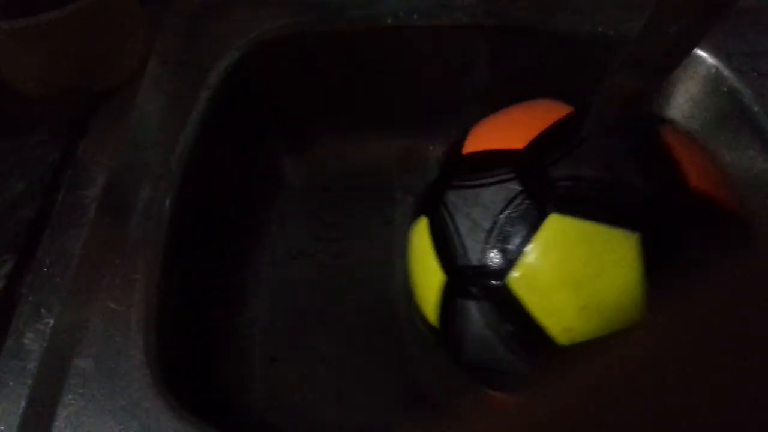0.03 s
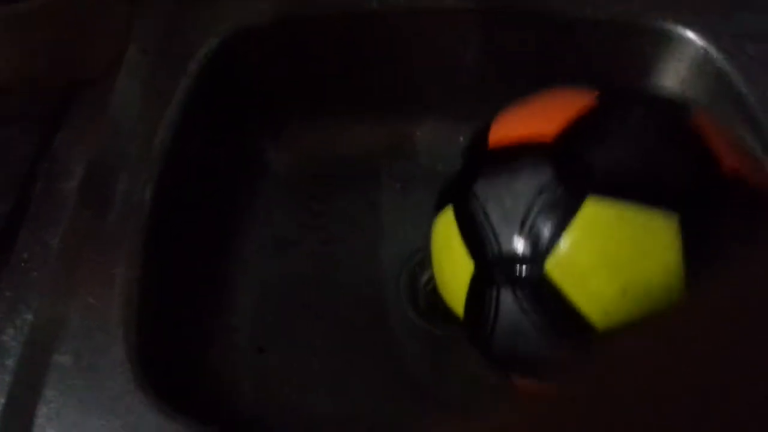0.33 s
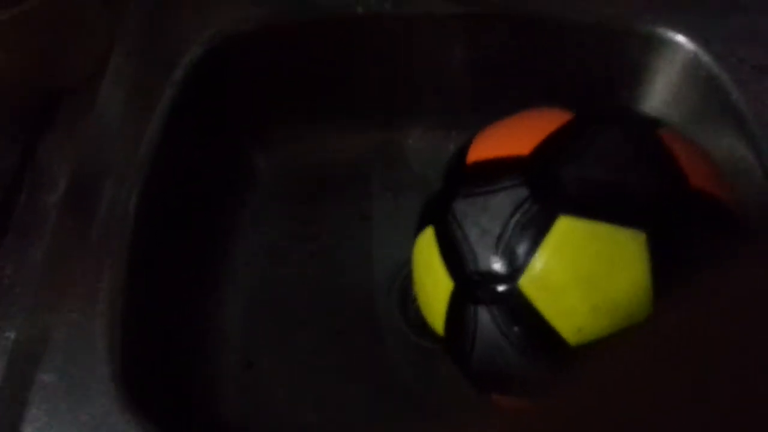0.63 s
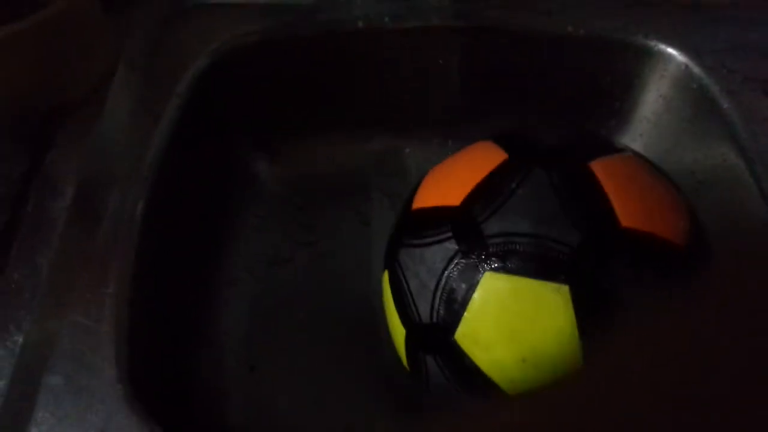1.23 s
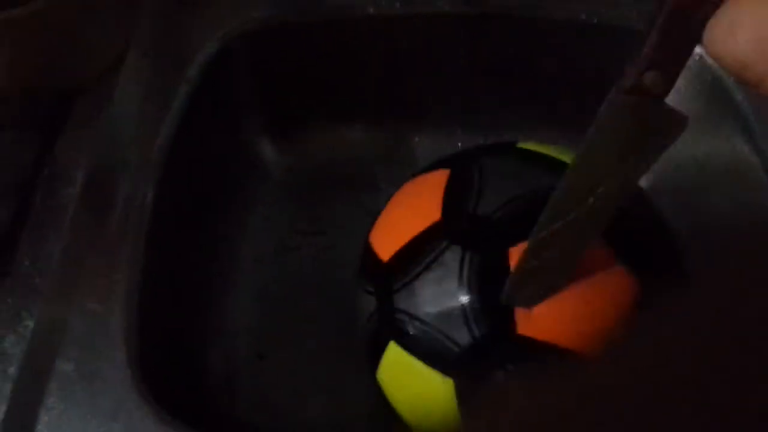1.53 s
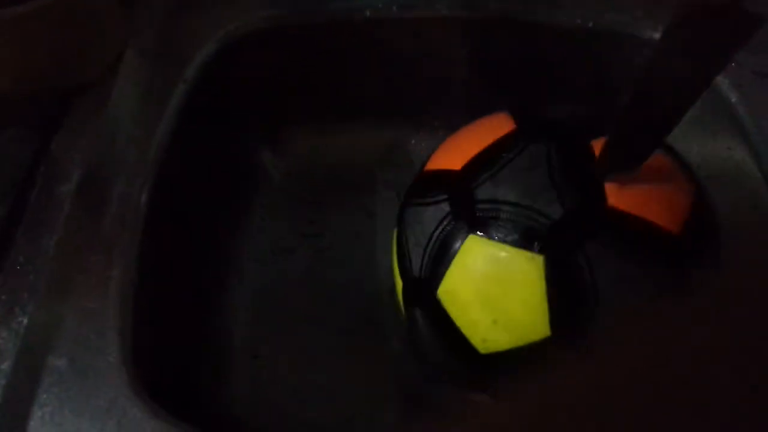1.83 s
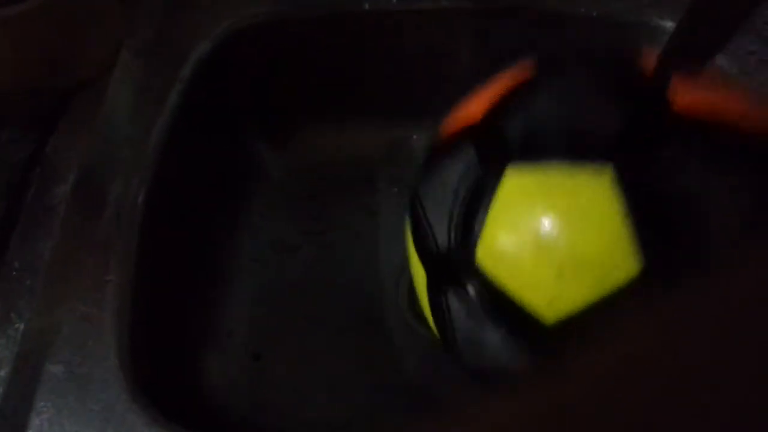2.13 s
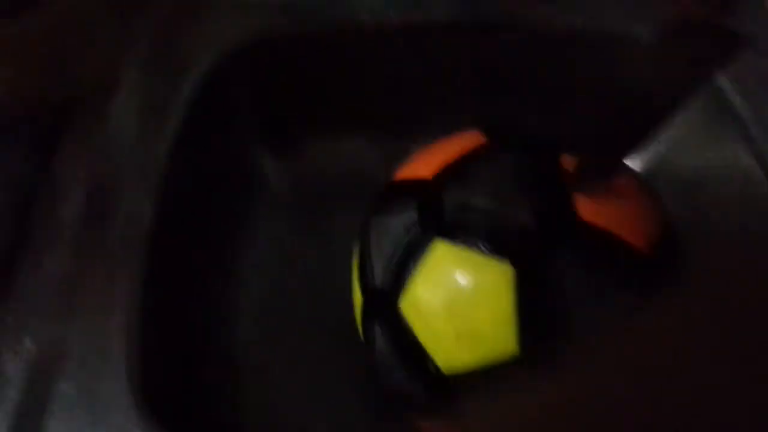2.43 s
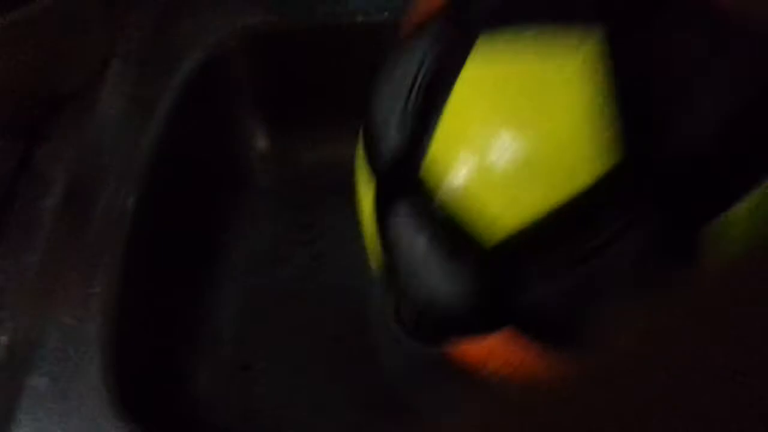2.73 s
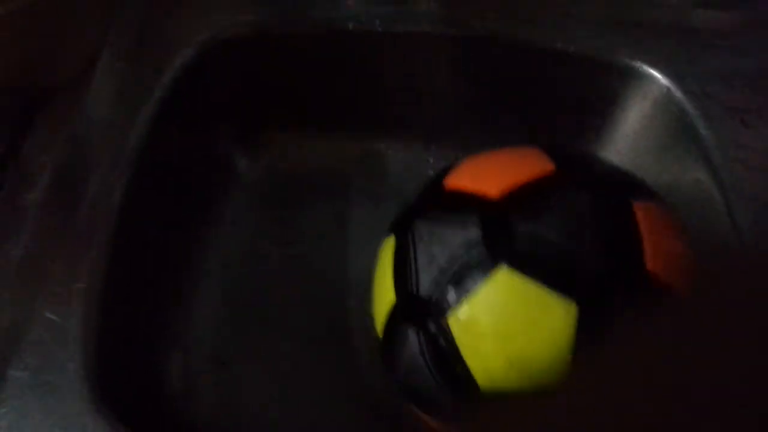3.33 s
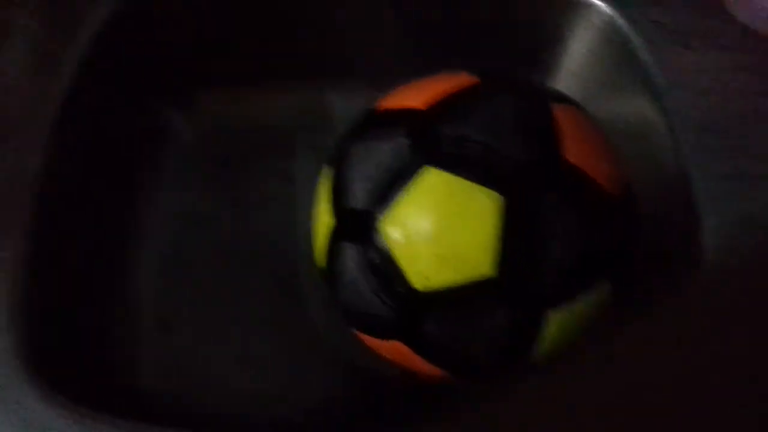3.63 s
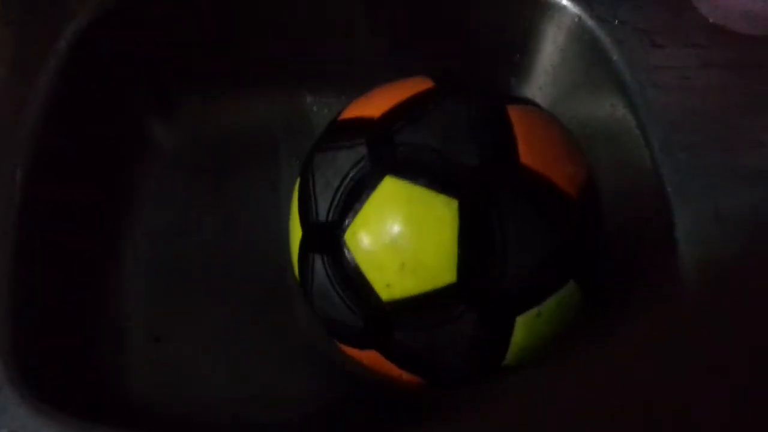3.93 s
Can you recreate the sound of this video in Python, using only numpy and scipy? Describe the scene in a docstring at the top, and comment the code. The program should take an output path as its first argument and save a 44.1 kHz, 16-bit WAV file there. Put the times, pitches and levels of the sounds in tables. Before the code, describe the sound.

Plastic football knocking around a metal sink, struck once by a knife, then bouncing again.

```python
"""Plastic football in a steel sink

A small ball is knocked about a kitchen sink, close by, in a hard-walled room with a faint hiss.
It bounces to rest, rings under one hard knife blow, is flicked up, bounces again and rolls out.
Each landing booms in the basin's modes while the ball's skin slaps against the steel.
Sliding and rolling rub the skin over the steel with an uneven grip."""
import sys
import numpy as np
from scipy import signal
from scipy.fft import rfft, irfft
from scipy.io import wavfile
from scipy.ndimage import uniform_filter1d

SR = 44100
rng = np.random.default_rng(int(sys.argv[2]) if len(sys.argv) > 2 else 0)


def master_out(mix):
    """Clip the mix to full scale and print it as 16-bit PCM to the path in sys.argv[1]."""
    frames = np.transpose(np.atleast_2d(mix))
    ceiling = np.clip(frames, -1, 1)
    pcm = np.round(ceiling * 32767).astype(np.int16)
    wavfile.write(sys.argv[1], SR, pcm)


N = 176400
TIME_S = np.arange(N) / SR
IR_LEN = 32768
AGE_S = TIME_S[:IR_LEN]
BIN_HZ = np.maximum(np.arange(IR_LEN // 2 + 1) * SR / IR_LEN, 1)


def amp(db):
    """Decibels to gain."""
    return 10 ** (np.asarray(db) / 20)


def at_hz(table, hz=BIN_HZ, column=1):
    """Table column interpolated over log frequency."""
    rows = np.array(table)
    return np.interp(np.log(hz), np.log(rows[:, 0]), rows[:, column])


def unit_energy(x):
    """Scale to energy 1."""
    return x / np.sqrt(np.sum(x ** 2) + 1e-20)


def convolve(x, response):
    """Convolution cut to the input length."""
    return signal.fftconvolve(x, response)[:len(x)]


def pulse(spectrum_db):
    """Minimum-phase pulse with the given spectrum."""
    cepstrum = irfft(np.log(amp(spectrum_db)))
    cepstrum[1:IR_LEN // 2] *= 2
    cepstrum[IR_LEN // 2 + 1:] = 0
    return irfft(np.exp(rfft(cepstrum)))


def add(track, start_s, sound):
    """Mix a sound in at start_s."""
    start = int(start_s * SR)
    track[start:start + len(sound)] += sound[:N - start]


def burst(fade_s):
    """Decaying spray of tiny contacts or echoes, energy 1."""
    return unit_energy(rng.standard_normal(IR_LEN) * np.exp(-AGE_S / fade_s))


def ringing(modes, build_s):
    """Decaying sines of a struck body, building up during contact."""
    sines = sum(amp(db - 60 * AGE_S / t60_s) * np.sin(2 * np.pi * hz * AGE_S) for hz, db, t60_s in modes)
    return sines * (1 - np.exp(-AGE_S / build_s))


def noise(spectrum):
    """Steady coloured noise, rms 1."""
    coloured = convolve(rng.standard_normal(N + IR_LEN), pulse(at_hz(spectrum)))
    return unit_energy(coloured[IR_LEN:]) * np.sqrt(N)


# Background colour: freq_hz, level_db
HISS_SPECTRUM = [(25, -9), (90, -15), (150, -18), (190, -1.5), (240, -24), (380, -7), (490, -12.5),
                 (590, -2.5), (800, -12), (1200, -16.5), (2400, -28), (4800, -31), (6200, -26), (7800, -29),
                 (8500, -39.5), (12000, -43), (15500, -53)]
# Background swell: time_s, gain_db
HISS_ENVELOPE = [(0, 3), (.3, 4), (1.3, 1), (2.1, 2.5), (2.6, 9.5), (4, -1.5)]


def room_hiss(level_db=-62):
    """Faint background noise, slowly rising and falling."""
    swell_db = np.interp(TIME_S, *np.transpose(HISS_ENVELOPE))
    return noise(HISS_SPECTRUM) * amp(level_db + swell_db)


# Skin contacts: start_s, level_db, pitch_hz, fade_s, treble_db
SKIN_SLAPS = [(0.289, -22.5, 6300, .007, 13), (.377, -10, 3700, 0.011, -20), (.393, 3, 6560, 0.0036, -25),
              (0.4, -2.5, 3360, 0.009, -3), (0.519, -2, 6250, 0.011, -1), (.537, -2, 4300, 0.0036, -16),
              (0.632, -15, 7000, .01, 4), (.651, -3.5, 4530, 0.0032, -5), (.722, -13, 7140, 0.022, 4),
              (.742, 0, 6600, 0.003, -2.5), (0.814, -5.5, 4800, .004, -30), (.851, -11, 5900, 0.0035, 0),
              (.870, -8.5, 6200, 0.0023, 7), (1.457, -38, 6100, 0.0038, -2), (1.485, -3, 6370, 0.042, 6.5),
              (1.759, -24.5, 7000, 0.03, 1), (2.512, -3.5, 6420, 0.011, 3.5), (2.526, -3, 5100, 0.019, -7),
              (2.625, -39, 9800, 0.0046, 36), (2.687, -39, 6000, 0.0023, 3), (2.938, -4, 6400, .01, 0),
              (2.954, 0, 6260, 0.0082, 9), (3.131, 4, 6900, 0.021, 5), (3.147, 8, 4960, 0.0054, 0),
              (3.273, -4.5, 8600, 0.0077, 5), (3.29, 4.5, 2960, 0.0041, -28),
              (3.384, -11.5, 6230, 0.011, 12), (3.408, -13.5, 7300, .004, 1),
              (3.496, -13.5, 4160, 0.0054, -4), (3.541, -16, 6660, 0.011, 1)]
# Slap colour: freq_hz, level_db
SKIN_SPECTRUM = [(200, -30), (900, -1), (2000, -6.5), (4000, -1.5), (6000, -2), (7400, -4.5), (9000, -15.5),
                 (11000, -25), (15500, -41)]


def skin_slaps(gain_db=2, snap=0.52, peak_db=8, width_oct=0.22, shelf_hz=(7840, 11740)):
    """The skin snaps onto the steel and crackles as it flattens, each slap at its own pitch."""
    out = np.zeros(N)
    for start_s, level_db, pitch_hz, fade_s, treble_db in SKIN_SLAPS:
        contact = burst(fade_s)
        contact[0] += snap
        resonance_db = peak_db * np.exp(-0.5 * (np.log2(BIN_HZ / pitch_hz) / width_oct) ** 2)
        shelf_db = np.interp(BIN_HZ, shelf_hz, [0, treble_db])
        colour = pulse(at_hz(SKIN_SPECTRUM) + resonance_db + shelf_db)
        add(out, start_s, amp(gain_db + level_db) * convolve(contact, colour))
    return out


# Pushes on the basin: start_s, boom_db, body_db, ring_db, clang_db
BALL_LANDINGS = [(0.38, -3.5, 1.5, -2, -9.5), (.396, -3, -3.5, 0, -8), (.519, -7.5, -2, -15.5, -15.5),
                 (0.54, -2, -4, 3.5, -5), (.632, -7, -31, -14, -13.5), (.654, -6.5, -3.5, 3, -7.5),
                 (.746, -5.5, -1.5, 4, -13.5), (.820, -15, -5.5, -10.5, -12.5),
                 (0.875, -22, -2.5, -24, -19.5), (0.917, -11, -15, -44, -25), (.962, -31, -36, -41, -30),
                 (1.465, -5, -4.5, -5, -10.5), (2.510, -6.5, -1.5, -19, -7.5),
                 (2.529, -11.5, -14.5, -10, -13), (2.941, 8, 3, -4.5, -5.5), (2.958, 0.5, -13, -6.5, -1),
                 (3.067, -12, -30, -40, -40), (3.132, 2.5, -5, -6.5, -18), (3.150, -0.5, 3, 4.5, -7),
                 (3.274, -1.5, 2, -9.5, -20), (3.294, -15, -7, -3.5, -4.5), (3.388, -3, -7, -24, -13),
                 (3.408, -4, 1, -10, -12), (3.498, -7.5, -2.5, -14.5, -19.5),
                 (3.567, -10.5, -2, -25, -25.5), (3.622, -21, -9, -36, -39)]
# Main basin modes: freq_hz, level_db, t60_s
BASIN_MODES = [(85.2, -47.5, 0.47), (161.1, -34.5, 0.83), (188.64, -21, 0.37), (227, -21.5, 0.058),
               (299, -26, 0.25), (332.6, -15, 0.032), (386.1, -32, 0.44), (406.3, -29.5, 0.38),
               (422.7, -34, 0.14), (552, -31, 0.52), (578.6, -17.5, 0.11), (597.7, -30.5, 0.32),
               (758.6, -33, 0.38), (1073, -46, 0.25), (1295, -33, .25)]
# Dense weak modes: freq_hz, level_db
WEAK_MODE_SPECTRUM = [(40, -27), (90, -10), (125, -16), (200, -6.5), (400, 5), (600, -1.5), (850, -5.5),
                      (1250, -6.5), (2000, -10), (3500, -25.5), (8000, -43), (15500, -69)]
# Bass colour of the booms and knife crack, low bump near 88 Hz, dip at 120 Hz: freq_hz, gain_db
BASS_COLOUR = [(35, -18), (60, -9.5), (88, 3.5), (120, -18), (165, -6), (230, 1.5)]


def basin_booms(bands_hz=(190, 350, 600, 1400), weak_db=-7.5, weak_t60_s=0.13, weak_build_s=0.0012):
    """Each landing rings the main modes and, by where it falls, its own mix of weak ones."""
    pushes, weak_rings = np.zeros(N), np.zeros(N)
    weak_envelope = amp(weak_db - 60 * AGE_S / weak_t60_s) * (1 - np.exp(-AGE_S / weak_build_s))
    for start_s, *levels_db in BALL_LANDINGS:
        push = pulse(at_hz(list(zip(bands_hz, levels_db))))
        add(pushes, start_s, push)
        add(weak_rings, start_s, convolve(push, weak_envelope * rng.standard_normal(IR_LEN)))
    main = convolve(pushes, ringing(BASIN_MODES, build_s=0.0022))
    weak = convolve(weak_rings, pulse(at_hz(WEAK_MODE_SPECTRUM)))
    return convolve(main + weak, pulse(at_hz(BASS_COLOUR)))


# Blade contacts in one blow: start_s, level_db
KNIFE_CONTACTS = [(1.4554, -16.5), (1.4639, 4.5), (1.4685, -11)]
# Hollow ball modes: freq_hz, level_db, t60_s
BALL_MODES = [(725, -31, 0.21), (997, -43.5, .18), (1097, -22.5, 0.083), (1142, -25.5, 0.12),
              (1184, -29.5, 0.34), (1218, -24, 0.17), (1340, -17, 0.077), (1353, -28, 0.15),
              (1660, -30, 0.13)]
# Crack colour: freq_hz, level_db
CRACK_SPECTRUM = [(120, -16), (230, -2), (400, -1), (800, -6), (1200, 2), (1750, -6), (2100, -13),
                  (2700, -13), (4000, -26), (7000, -24), (10000, -44.5), (15000, -61)]


def knife_blow(crack_db=18.5):
    """The blade grazes, then strikes the ball: a crack and a hollow ring."""
    out = np.zeros(N)
    ring = ringing(BALL_MODES, build_s=0.0008)
    colour = pulse(at_hz(CRACK_SPECTRUM) + at_hz(BASS_COLOUR))
    for start_s, level_db in KNIFE_CONTACTS:
        crack = amp(crack_db) * convolve(burst(fade_s=0.03), colour)
        add(out, start_s, amp(level_db) * (ring + crack))
    return out


def friction(envelope, spectrum, roughness_db=1):
    """Skin rubbing on steel: noise whose level wavers with the uneven grip."""
    grip = unit_energy(uniform_filter1d(rng.standard_normal(N), size=250)) * np.sqrt(N)
    level_db = np.interp(TIME_S, *np.transpose(envelope), left=-120)
    return noise(spectrum) * amp(level_db + roughness_db * grip)


# Slide loudness: time_s, level_db
SLIDE_ENVELOPE = [(2.52, -63), (2.56, -61), (2.63, -53), (2.69, -54.5), (2.75, -61.5), (2.81, -51.5),
                  (2.87, -56.5), (2.92, -54), (2.938, -30), (2.97, -46.5), (3.1, -50.5), (3.5, -55.5),
                  (4, -65.5)]
# Slide colour: freq_hz, level_db
SLIDE_SPECTRUM = [(1000, -1), (3000, -10), (4800, -5), (5800, 6), (7800, 2), (10000, -10.5), (15500, -22.5)]


def ball_slide():
    """The skin slides on the steel as the ball is flicked up."""
    return friction(SLIDE_ENVELOPE, SLIDE_SPECTRUM)


# Roll loudness: time_s, level_db
ROLL_ENVELOPE = [(3.3, -57), (3.52, -51), (3.68, -47), (3.82, -49.5), (3.87, -61), (4, -74)]
# Roll colour: freq_hz, level_db
ROLL_SPECTRUM = [(300, -11), (600, 7.5), (1000, -10), (2100, -4.5), (2800, -13.5), (3480, 1), (4000, -11.5),
                 (6500, -16), (10000, -27), (15500, -30.5)]


def ball_roll():
    """The ball rolls out, rubbing softly on the basin."""
    return friction(ROLL_ENVELOPE, ROLL_SPECTRUM)


# Room reverberation: freq_hz, level_db, t60_s
ROOM_TAIL = [(100, -15, 0.96), (298, -13, 0.61), (600, -10, .58), (1300, -10.5, 0.58), (3000, -7.5, 0.6),
             (6540, -11.5, 0.63), (14000, -3, 0.61)]


def echoes(x, early_db=-7.5, early_s=0.01):
    """Quick echoes between the basin walls give way to the room tail, dying band by band."""
    edges_hz = np.geomspace(60, 16000, 13)
    white = rng.standard_normal((2, IR_LEN))
    build = 1 - np.exp(-AGE_S / early_s)
    tail = np.zeros(IR_LEN)
    for k, band_hz in enumerate(zip(edges_hz, edges_hz[1:])):
        centre_hz = np.sqrt(np.prod(band_hz))
        t60_s = at_hz(ROOM_TAIL, centre_hz, column=2)
        envelope = unit_energy(amp(-60 * AGE_S / t60_s) * build)
        bandpass = signal.butter(2, band_hz, "band", fs=SR, output="sos")
        tail += amp(at_hz(ROOM_TAIL, centre_hz)) * envelope * signal.sosfilt(bandpass, white[k % 2])
    highpass = signal.butter(2, 1500, "high", fs=SR, output="sos")
    early = signal.sosfilt(highpass, burst(early_s))
    return convolve(x, tail + amp(early_db) * early)


def scene():
    """Mono mix: hits with echoes, dry friction, background."""
    hits = basin_booms() + skin_slaps() + knife_blow()
    return (hits + echoes(hits) + ball_slide() + ball_roll() + room_hiss())[None]


def record(dry):
    """Steep low-pass."""
    cutoff_hz = 15900
    return signal.sosfilt(signal.ellip(10, 0.1, 80, cutoff_hz, fs=SR, output="sos"), dry)


dry = scene()
out = record(dry)
master_out(out)
```